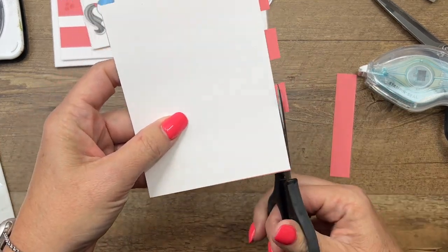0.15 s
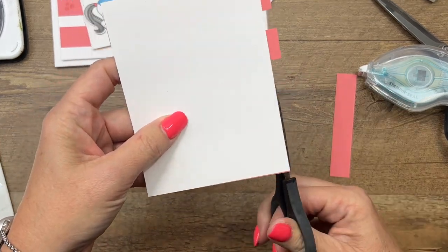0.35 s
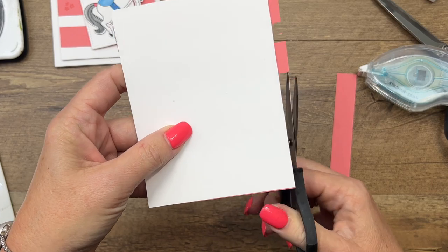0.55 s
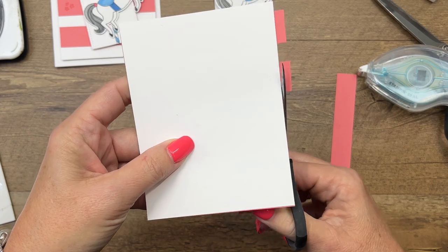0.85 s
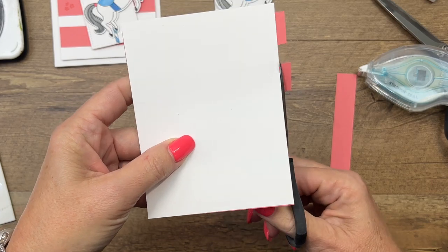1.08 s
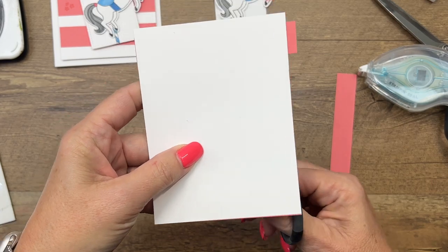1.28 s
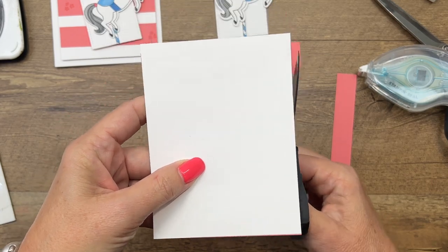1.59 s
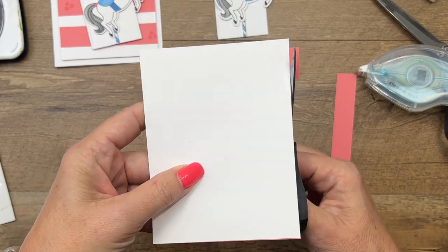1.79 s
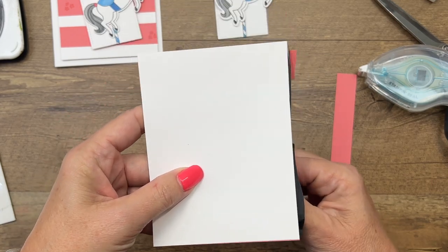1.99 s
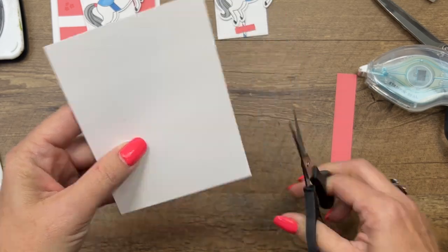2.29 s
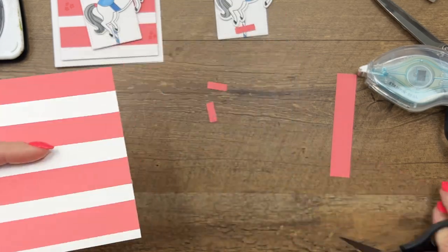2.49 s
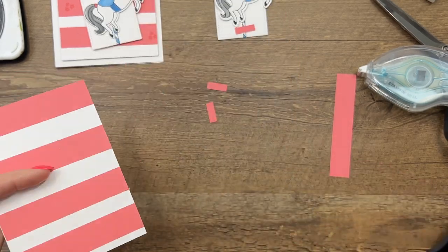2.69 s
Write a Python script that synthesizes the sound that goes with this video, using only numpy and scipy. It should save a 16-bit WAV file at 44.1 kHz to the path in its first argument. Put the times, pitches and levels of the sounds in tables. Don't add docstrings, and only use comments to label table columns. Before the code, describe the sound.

Small scissors cut thick paper up close in a quiet small room: three fibrous crunches, each ending in a crisp snap, with light paper rustle between, then the scissors are laid on a wooden table with knocks.

```python
import sys
import numpy as np
from scipy import signal
from scipy.fft import rfft, irfft, next_fast_len
from scipy.io import wavfile
from scipy.ndimage import uniform_filter1d

SR = 44100
rng = np.random.default_rng(int(sys.argv[2]) if len(sys.argv) > 2 else 0)


def boost_factor(decibels):
    exponent = np.asarray(decibels, float) / 20
    return 10 ** exponent


def to_wav(sig):
    pcm = np.clip(np.atleast_2d(sig), -1, 1) * 32767
    pcm = np.round(pcm).astype(np.int16)
    wavfile.write(sys.argv[1], SR, pcm.T)


N = 125685

# [f/Hz, level/dB per Hz]
AIR_SPECTRUM = [(18, -32), (34, -6), (55, 1.5), (110, -7.5), (395, -20.5), (918, -31), (1560, -24),
                (3000, -37), (9300, -41.5), (13000, -80)]
# [t/s, level/dB re room tone]
ARM_RUMBLE = [
    (0, -3),
    (.6, 3.5),
    (1.0, -1.5),
    (1.3, 2),
    (1.5, -20),
    (1.8, -8),
    (2.0, -1.5),
]
# [f/Hz, t60/s]
ROOM_DECAY = [(100, 0.5), (500, 0.16), (2000, 0.24), (6000, 0.27), (12000, 0.19)]
# [f/Hz, likeness 0..1]
ROOM_LIKENESS = [(150, .9), (600, .2), (5000, .1), (8000, .95), (9500, 1)]
# [f/Hz, phase/rad]
PORT_LEAD = [(0, 0), (2000, -.3), (5000, -1.3), (6500, -1.9), (8200, 0), (10150, 3.14), (12000, 6.28),
             (15600, 12.5)]
# [f/Hz, phase/rad]
TABLE_LEAD = [(0, 0), (300, .45), (600, 1), (1200, 1.5), (3500, 1.3), (5500, -1), (8000, 0)]
HAND_PAN = np.array([[.45], [-.45]])
# [t/s, level/dB, f/Hz]
ARM_JOLTS = [
    (1.252, -39, 91),
    (1.869, -30.5, 69),
    (2.051, -38, 60),
    (2.116, -43, 48.5),
    (2.362, -38, 54.4),
    (2.448, -27.5, 59),
    (2.562, -27.5, 76),
    (2.642, -30, 81),
    (2.77, -44, 70),
    (2.817, -28.5, 80),
]
# [t/s, crack level/dB, thump/dB re crack, knock/dB re crack]
HANDLE_LANDINGS = [
    (2.7365, -63, -10, 20),
    (2.7465, -43, -18, 7),
    (2.7512, -20, -4.5, -7.5),
    (2.7552, -8.5, -70, -8.5),
    (2.8007, -26, -2, 2.5),
    (2.8036, -31, -1, -39),
    (2.8325, -44, -10, 0),
    (2.8424, -32.5, -5, 2.5),
]
# [t/s, crack level/dB, thump/dB re crack, knock/dB re crack]
TIP_LANDINGS = [
    (2.5312, -14.5, -23, -10.5),
    (2.5594, -16, -18.5, -10),
    (2.5915, -38, -19, -2),
    (2.6084, -39.5, -1, -11),
]
# [t/s, crack level/dB, thump/dB re crack, knock/dB re crack]
PIVOT_TICKS = [
    (0.5883, -54, -18, -18),
    (1.4706, -49, -42, -48),
    (1.5004, -48, -29, -43),
    (1.5203, -50, -35, -30),
    (1.5414, -55.5, -33, -18),
    (1.5831, -49.5, -29, -29),
    (1.7835, -64, -23, -16),
]
# [t/s, crack level/dB, thump/dB re crack, knock/dB re crack]
CARD_BUMPS = [(0.1295, -48, 12.5, 11.5), (0.38, -56, 5, -2.5), (0.7005, -70, 22.5, 7),
              (0.7155, -65, 14, -5), (0.729, -69.5, 33.5, -8), (0.734, -57, 17, 6), (0.74, -59.5, 28, 0),
              (0.7515, -60.5, 26, 10.5), (0.762, -56.5, 26.5, -12), (0.771, -56, 22.5, 11.5),
              (0.804, -48, 13, 9), (0.824, -70.5, -7.5, 16.5), (0.9124, -53, 3, -13),
              (1.1897, -39, 0, -9.5), (1.6334, -50, 5, 7.5), (1.8556, -47, 11, -2),
              (1.8599, -33.5, 1.5, -2), (2.274, -58, -22, -13), (2.3095, -48, -1.5, -7.5),
              (2.3422, -56, 10, 10.5), (2.422, -50, -2, -18), (2.4385, -56, -26, 5.5),
              (2.4495, -54, 25.5, 5)]
# [start t/s, length/s, fizz level/dB, thump/dB re fizz, knock/dB re fizz]
PAPER_STROKES = [(0.121, 0.049, -59.5, 4, -3), (0.177, 0.11, -62.5, 10.5, 5), (0.316, 0.13, -82, 12, 10),
                 (0.446, 0.1, -72, -17, -1), (0.598, 0.15, -82.5, 7, 9.5), (0.723, 0.071, -65.5, 10, 8),
                 (0.794, 0.059, -74, 18, -7), (0.916, 0.053, -64, 5, -3), (0.969, 0.093, -66, 8.5, -1.5),
                 (1.078, 0.043, -85.5, 19, 15), (1.591, 0.11, -62.5, -5.5, 1), (1.787, 0.055, -64.5, -3, 2),
                 (1.865, 0.13, -62.5, -42, -3.5), (2.07, 0.062, -80, -21, 7),
                 (2.257, 0.103, -61.5, -19, -7.5), (2.352, 0.071, -69.5, 7.5, 4.5),
                 (2.42, 0.05, -57.5, 5, -1), (2.485, 0.091, -61, -1, 2), (2.537, 0.1, -46, -8.5, -2.5),
                 (2.629, 0.15, -61, 0, 5.5), (2.745, 0.1, -49, 8.5, -18)]
# [t/s, crack level/dB, thump/dB re crack, knock/dB re crack, burst/s]
FIBRE_RIPS = [(0.15, -48, -11, -4, 0.0085), (0.184, -42.5, 4, -4.5, 0.003), (0.2, -45.5, -22, -16, 0.0038),
              (0.221, -47.5, -11, -23, 0.0033), (0.243, -43, -18, -18, 0.0021),
              (0.257, -48.5, -23, -11, 0.0062), (0.275, -38, -35, -37, 0.0015),
              (0.2985, -37.5, -9, -7.5, 0.0029), (0.927, -51.5, 1, -14, 0.0034),
              (0.949, -57, -8, -15, 0.0036), (0.97, -41.5, -17, -18, 0.0025), (0.977, -46, -2.5, -6, 0.005),
              (0.985, -49, -15, -6, 0.0015), (0.998, -46, -18, -10, 0.0029), (1.014, -40, -7, -30, 0.0014),
              (1.036, -51, -13, -9, 0.0036), (1.051, -48, -23, -20, 0.0044), (1.072, -48, 5, -15, 0.0011),
              (1.379, -53.5, -30, -6.5, 0.0061), (1.596, -49, -30, -8, 0.0083),
              (1.613, -44, -13, -11, 0.0035), (1.692, -55.5, -29, -7, 0.0027), (1.9, -45.5, -36, -15, .004),
              (1.94, -46, -30, -24, 0.0024), (1.956, -47.5, -28, -10, 0.0057),
              (1.983, -44.5, -30, -13, 0.0025), (2.012, -44, -11, -19, 0.0018),
              (2.039, -42, -19, -6, 0.0045), (2.384, -55.5, -16, -12, .002),
              (2.686, -43.5, -30, -22, 0.0011)]
# [t/s, crack level/dB, card thump/dB re crack, knock/dB re crack, brightest band f/Hz]
BLADE_SNAPS = [
    (0.3236, -21.5, -14, -20.5, 4890),
    (0.4568, -38, -24, -21.5, 5900),
    (1.2362, -15.5, -3.5, -15.5, 12050),
    (1.3895, -35, -25, -48, 5930),
    (2.0458, -22, -48, -13.5, 4840),
    (2.1975, -32, -77, -52, 6500),
    (2.204, -31, -65, -55, 7740),
]
# [f/Hz, level/dB, t60/s]
CARD_LOW = [(210, -5, 0.017), (381, 9.5, 0.009), (557, -1, 0.044), (652, 7, 0.0085)]
CARD_MID = [(788, -1.5, 0.023), (1008, 6, 0.013), (1428, 18.5, 0.0083), (2292, 14, 0.011)]
# [f/Hz, level/dB, t60/s]
FLAP_LOW = [(265, -10.5, 0.041), (387, -1.5, 0.044), (593, 1.5, 0.017)]
FLAP_MID = [(1208, -2, 0.013), (1384, -0.5, 0.01), (2226, -6.5, 0.03)]
# [f/Hz, level/dB, t60/s]
TABLE_LOW = [(213, -3.5, 0.36), (397, -1, 0.081), (727, 8, 0.014)]
# [f/Hz, level/dB, t60/s]
HANDLE_MID = [(1075, 2, .02), (1450, 5, .012), (1800, 9, .014), (2090, 5, .02), (2460, 3, .012),
              (3070, 0, .015)]
BLADE_MID = [(1044, -4, 0.021), (2069, 4, 0.038), (2780, 7, 0.016), (1620, 2, 0.016)]
STEEL = [(4590, 0, .07), (6060, 0, .06)]
# [f/Hz, level/dB]
CRACK_SPECTRUM = [(1000, -21), (3200, -0.5), (4900, 3.5), (7000, 1.5), (11500, 3), (13000, -11),
                  (15600, -4.5), (16800, -43)]
# [f/Hz, level/dB]
RUB_TILT = [(5000, 3), (9000, -2), (13000, -17)]
# [f/Hz, level/dB]
RIP_TILT = [(2500, 3), (5000, -1.5), (7000, -3.5), (13000, 0.5)]

HIT_LEN = 6000
LANDING_S = 0.00061


def evened(x):
    return x / np.sqrt(np.mean(x ** 2) + 1e-20)


def peaked(x):
    return x[:HIT_LEN] / abs(x).max()


def read(points, hz):
    f, value = np.transpose(points)
    return np.interp(np.log(hz + 1), np.log(f + 1), value)


def add(mix, s, sound):
    part = mix[max(round(s * SR), 0):][:len(sound)]
    part += sound[:len(part)]


def colour(x, points):
    size = next_fast_len(len(x) + 256)
    gain = boost_factor(read(points, np.fft.rfftfreq(size, 1 / SR)))
    return irfft(rfft(x, size) * gain, size)[:len(x)]


def unstriped(x):
    z = rfft(x)
    smooth = irfft(z / uniform_filter1d(abs(z), size=60), len(x))
    return smooth * (np.arange(len(x)) < len(x) // 2)


def patchy(x):
    z = signal.stft(x, nperseg=256)[2]
    patches = uniform_filter1d(rng.standard_normal(z.shape), size=7, axis=0)
    patches = evened(uniform_filter1d(patches, size=6, axis=1))
    return signal.istft(z * boost_factor(3.5 * patches), nperseg=256)[1][:N]


def ports(x, points):
    size = next_fast_len(N + 2048)
    lead = np.interp(np.fft.rfftfreq(size, 1 / SR), *np.transpose(points))
    lead = lead * np.array([[-.5], [.5]])
    return irfft(rfft(x, size) * np.exp(1j * lead), size)[:, :N]


def air():
    middle, side = rng.standard_normal((2, N))
    low = signal.sosfilt(signal.butter(2, 250, fs=SR, output="sos"), middle)
    rumble_db = np.interp(np.arange(N) / SR, *np.transpose(ARM_RUMBLE))
    middle = colour(middle + low * (boost_factor(rumble_db) - 1), AIR_SPECTRUM)
    side = colour(colour(side, AIR_SPECTRUM), [(150, -12), (1000, 0.5), (6000, 0.5), (9000, -43)])
    return boost_factor(-68) * evened(np.array([middle + side, middle - side]))


def room(x):
    taps = np.zeros((2, SR // 2))
    at = np.arange(160, SR // 2 - 20, 20) + rng.integers(0, 20, (2, (SR // 2 - 161) // 20))
    np.put_along_axis(taps, at, rng.choice([-1., 1.], at.shape), 1)
    hz, t, z = signal.stft(taps, SR, nperseg=256)
    same = np.clip(read(ROOM_LIKENESS, hz), 0, 1)[:, None]
    z[1] = same * z[0] + np.sqrt(1 - same ** 2) * z[1]
    decay = boost_factor(-60 * t / read(ROOM_DECAY, hz)[:, None])
    tail = signal.istft(z * decay, SR, nperseg=256)[1]
    return signal.fftconvolve(x[None], tail / np.linalg.norm(tail[0]), axes=1)[:, :N]


def jolts():
    t, out = np.arange(9000) / SR, np.zeros(N)
    rise_s, t60_s = 0.003, 0.14
    for s, db, hz in ARM_JOLTS:
        swell = 1 - np.exp(-t / rise_s)
        add(out, s, swell * boost_factor(db - 11.5 - 60 * t / t60_s) * np.sin(2 * np.pi * hz * t))
    return out


def ring(modes):
    t, out = np.arange(HIT_LEN) / SR, np.zeros(HIT_LEN)
    for k, (hz, db, t60) in enumerate(modes):
        detuned = hz * (1 + .05 * (rng.random() - .5))
        out += (-1) ** k * boost_factor(db - 60 * t / max(t60, .004)) * np.sin(2 * np.pi * detuned * t)
    return out


def hit(crack_db, thump_db, knock_db, burst_s, low, mid, steel, rise, tone):
    t = np.arange(HIT_LEN) / SR
    u = t / max(burst_s, 2e-4)
    shape = (1 - np.exp(-u / max(rise, .02))) ** 2 * np.exp(-u)
    rattle = boost_factor(-19.5) * (1 - np.exp(-u)) * np.exp(-t / 0.0064)
    push = (shape + rattle) * rng.standard_normal(HIT_LEN)
    shove = np.diff(shape, prepend=0) * (1 + 0.77 * rng.standard_normal(HIT_LEN))
    crack = peaked(colour(colour(unstriped(push), CRACK_SPECTRUM), tone))
    sing = peaked(signal.fftconvolve(push, ring(STEEL)))
    soft_shove = signal.fftconvolve(shove, np.hanning(SR // 900))[:HIT_LEN]
    thump = peaked(signal.fftconvolve(soft_shove, ring(low)))
    knock = peaked(signal.fftconvolve(peaked(shove) + 0.1 * peaked(push), ring(mid)))
    out = crack + steel * boost_factor(-24) * sing
    out += boost_factor(thump_db - 4) * thump + boost_factor(knock_db + 6) * knock
    return boost_factor(crack_db) * out


def contact(mix, event, burst_s, low, mid, steel=0, rise=0.09, tilt=((0, 0), (SR, 0))):
    s, crack_db, thump_db, knock_db = event[:4]
    hz = np.arange(1, 21) * 800.
    spot = np.transpose([hz, read(tilt, hz) + 3.5 * rng.standard_normal(20)])
    add(mix, s, hit(crack_db, thump_db, knock_db, burst_s, low, mid, steel, rise, spot))


def handles_landing():
    out = np.zeros(N)
    for event in HANDLE_LANDINGS:
        contact(out, event, LANDING_S, TABLE_LOW, HANDLE_MID, steel=0.45)
    return out


def tips_landing():
    out = np.zeros(N)
    for event in TIP_LANDINGS:
        contact(out, event, LANDING_S, TABLE_LOW, BLADE_MID, steel=1)
    return out


def pivot_ticks():
    out = np.zeros(N)
    for event in PIVOT_TICKS:
        contact(out, event, 0.0017, CARD_LOW, CARD_MID)
    return out


def card_bumps():
    out = np.zeros(N)
    for event in CARD_BUMPS:
        contact(out, event, 0.0014, CARD_LOW, CARD_MID)
    return out


def strokes():
    t, out = np.arange(N) / SR, np.zeros(N)
    clumps_per_s, clump_s, edge_s = 260, .0015, 0.0098
    slips = boost_factor(3.5 * rng.exponential(1, N)) * (rng.random(N) < clumps_per_s / SR)
    u = t[:2000] / clump_s
    clumps = evened(.7 + evened(signal.oaconvolve(slips, u * np.exp(-u))[:N]))
    click_db = 2 * np.minimum(rng.exponential(1, N), 5)
    grit = clumps * boost_factor(click_db) * rng.standard_normal(N)
    fizz = evened(patchy(colour(colour(grit, CRACK_SPECTRUM), RUB_TILT)))
    thump = evened(patchy(signal.oaconvolve(grit, ring(CARD_LOW))[:N]))
    knock = evened(patchy(signal.oaconvolve(grit, ring(CARD_MID))[:N]))
    for s, length, db, thump_db, knock_db in PAPER_STROKES:
        gate = np.clip(np.minimum((t - s) / edge_s, (s + length - t) / 0.015), 0, 1)
        out += gate * boost_factor(db) * (fizz + boost_factor(thump_db) * thump + boost_factor(knock_db) * knock)
    return out


def rips():
    out = np.zeros(N)
    for event in FIBRE_RIPS:
        contact(out, event, event[4], CARD_LOW, CARD_MID, rise=2.5, tilt=RIP_TILT)
    return out


def snaps():
    out, tint_db = np.zeros(N), 5.5
    for event in BLADE_SNAPS:
        hz = event[4]
        tint = [(hz * 0.79, 0), (hz * .9, tint_db), (hz * 0.96, tint_db), (hz * 1.26, 0)]
        contact(out, event, 0.00087, FLAP_LOW, FLAP_MID, rise=1.2, tilt=tint)
    return out


def scene():
    table = tips_landing() + handles_landing()
    hand = pivot_ticks() + card_bumps() + strokes() + rips() + snaps()
    near = hand * boost_factor(HAND_PAN) + ports(table * boost_factor(-HAND_PAN), TABLE_LEAD)
    return near + boost_factor(-8.5) * room(hand + table) + jolts() + air()


def band_limit(x):
    return signal.sosfilt(signal.butter(12, 17010, fs=SR, output="sos"), x)


def record(dry):
    low_cut = signal.butter(3, 42, "high", fs=SR, output="sos")
    x = signal.sosfilt(low_cut, ports(dry, PORT_LEAD))
    x = signal.oaconvolve(x, signal.firwin(255, 16500, fs=SR)[None], "same")
    mix = .5 * np.tanh(2 * x)
    return band_limit(mix)


dry = scene()
out = record(dry)
to_wav(out)
```